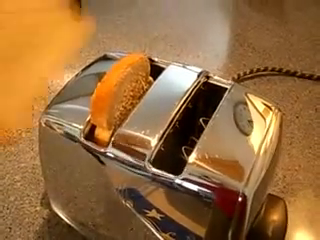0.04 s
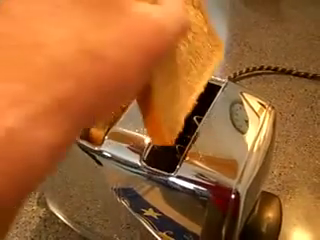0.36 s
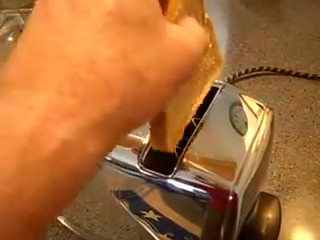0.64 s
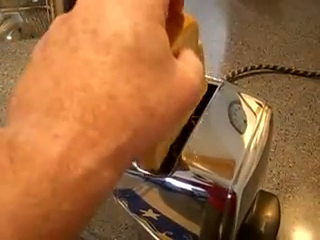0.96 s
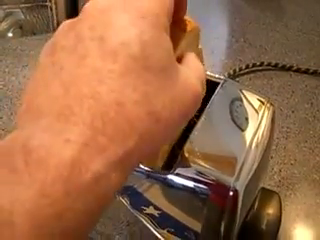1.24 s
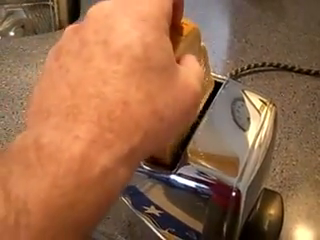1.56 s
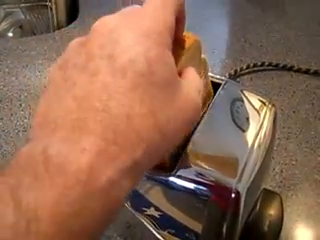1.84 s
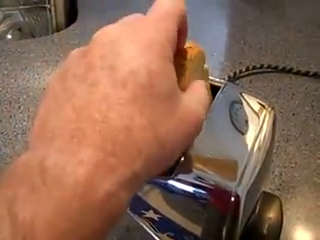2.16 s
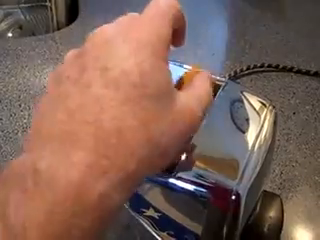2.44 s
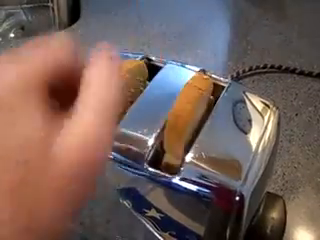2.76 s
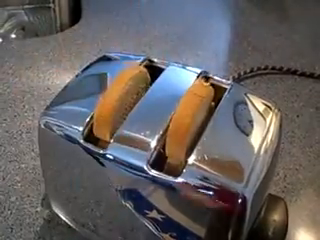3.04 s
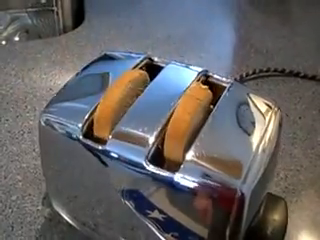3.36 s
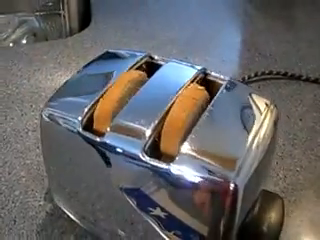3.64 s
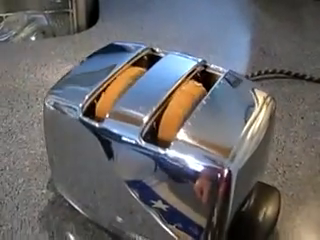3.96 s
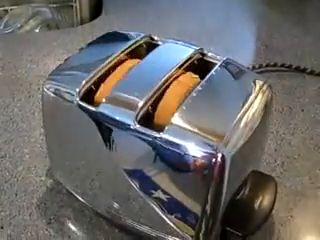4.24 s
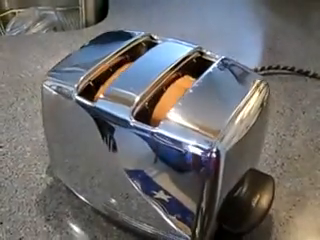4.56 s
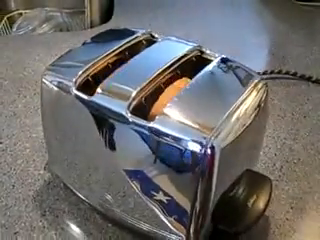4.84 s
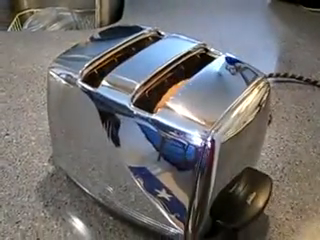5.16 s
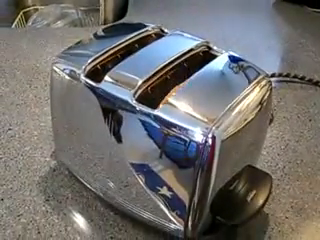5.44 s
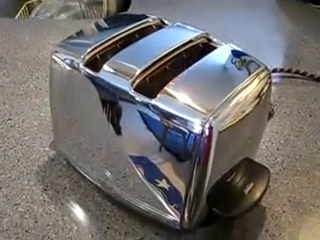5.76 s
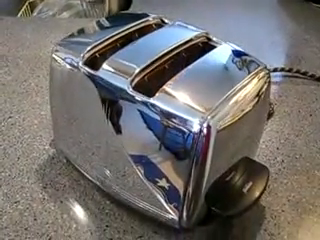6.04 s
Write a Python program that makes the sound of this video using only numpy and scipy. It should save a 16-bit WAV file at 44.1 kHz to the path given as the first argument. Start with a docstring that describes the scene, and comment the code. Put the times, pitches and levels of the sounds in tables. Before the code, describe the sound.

Bread scrapes into a metal toaster with light clacks, then after a pause the latch snaps shut, over quiet kitchen hum.

```python
"""A slice of bread goes into a chrome toaster, over room air, fridge hum, a far clock and a faint whine.
From 1.2 s the background grows louder, the crust scratches in the slot and the sprung carriage bounces.
Near 2 s the crust squeaks by stick-slip friction, then the slice drops on the wire rack.
At 3 s the lever is taken up with a clack; after a silent travel it snaps into its latch at 6.1 s.
Each impact on rack, lever or latch chatters and excites the damped modes of the steel."""
import sys
import numpy as np
from scipy import signal
from scipy.fft import rfft, irfft
from scipy.io import wavfile

SR = 44100
rng = np.random.default_rng(int(sys.argv[2]) if len(sys.argv) > 2 else 0)


def digitize_waveform(pressure):
    """Quantize a signal to 16-bit integers and store it at the path in sys.argv[1].

    Rows of a 2-D input are taken as channels; values are limited to [-1, 1].
    """
    field = np.atleast_2d(pressure).T
    bounded = np.clip(field, -1, 1)
    quanta = np.round(bounded * 32767).astype(np.int16)
    wavfile.write(sys.argv[1], SR, quanta)


N = 269010
T = np.arange(N) / SR
AGE = T[:2 ** 14]  # time since a contact


def rack():
    """Impact excitation: the falling slice sets the wire rack ringing."""
    hits = [(2.2548, -37, 1.4764, 13960, 0.0091, -8), (2.331, -45.5, -3, 3200, 0.013, 1.5),
            (2.3553, -24, 1.1, 15500, 0.012, -5)]  # landings: t/s, level/dB, tilt/(dB/octave), cutoff/Hz, chatter/s, ring/dB
    modes = [(562, -11, 0.293), (660, -2.5, 0.41), (700, -6, .18), (827, -5, 0.24), (1314, -9, 0.32),
             (1405, -13.5, 0.32), (1823, -9, 0.23), (1990, -4, 0.13), (2292, -6, 0.24), (2496, 0.5, 0.11),
             (2856.2, -7, 0.0788), (3550, -7.5, 0.16), (4100, -9.5, 0.14), (4842, -7, 0.1263),
             (6400, -17, .15), (9500, -23.5, 0.23), (9850, -14, 0.21), (10249, -19, 0.1509)]  # rack resonances: f/Hz, level/dB, unscaled T60/s
    colour = [(88, -48.5), (150, -15), (466, -12), (662, -1.5), (998, -14), (1340, -10), (2180, -9.5),
              (2360, -8), (3040, -11.5), (4410, -16.5), (4670, -14), (7620, -23), (10000, -17.5),
              (14800, -29), (16000, -42)]  # impact spectrum: f/Hz, level/dB
    return clack(hits, modes, colour, t60_scale=1.05, room_db=-2)


def lever():
    """Backlash: the lever is touched and strikes steel as it takes up its play."""
    hits = [(2.976, -49.5, 1.5, 5500, 0.0091, -5), (3.0378, -28, 1, 16000, 0.013, -3.5),
            (3.1755, -40, 2.5, 9800, .012, -5.5)]  # contacts: t/s, level/dB, tilt/(dB/octave), cutoff/Hz, chatter/s, ring/dB
    modes = [(653, -6.5, 0.5), (1069, -4, 0.25), (1168, -11, 0.43), (1303, -6, .28), (1415, -1, 0.2),
             (1614, -8, 0.19), (1672, -2, 0.37), (1940, -6, 0.16), (2250, -9, 0.13), (2500, -0.5, 0.14),
             (2750, -0.5, 0.15), (3140, -8, 0.14), (3305, -5, .15), (5310, -9.5, 0.14), (5841, -14, .14),
             (7600, -12, .18), (9652, -14, .09)]  # lever resonances: f/Hz, level/dB, unscaled T60/s
    colour = [(88, -40), (150, -6), (504, -9.5), (624, -6), (941, -6.5), (1660, -4.5), (2270, -10),
              (2700, -10.5), (4000, -10.5), (4320, -19), (5250, -16.5), (8070, -14), (11300, -17),
              (13700, -17.5), (16000, -36)]  # impact spectrum: f/Hz, level/dB
    return clack(hits, modes, colour, t60_scale=0.78, room_db=-3)


def latch():
    """Impacts in close succession fuse into one snap: the carriage meets its stop and the latch shuts."""
    hits = [(6.0612, -29, -5, 13000, 0.0066, -1.5), (6.0692, -19, 0, 16000, 0.00641, -10),
            (6.0752, -20, -0.4, 13590, 0.012, -7)]  # contacts: t/s, level/dB, tilt/(dB/octave), cutoff/Hz, chatter/s, ring/dB
    modes = [(219, -9, .15), (354, -8, 0.12), (614, 3.5, 0.085), (1312, 0, 0.32), (2173, -1, .12),
             (2504, -2.5, .15), (4450, -9, .08), (5088.3, -1, .1), (6800, 1, .06), (7390, 0, .15),
             (8581, 9, 0.12), (9100, 1, .15), (11000, -8, .08)]  # latch resonances: f/Hz, level/dB, unscaled T60/s
    colour = [(88, -38.5), (150, -18.5), (376, -9.5), (494, -10), (1100, -11), (1310, -5), (1560, -10),
              (2450, -2.5), (2980, -12), (4320, -4), (5910, -8.5), (6770, 0), (7920, -14), (8730, -4),
              (16000, -15)]  # impact spectrum: f/Hz, level/dB
    return clack(hits, modes, colour, t60_scale=0.66, room_db=-3)


def clack(hits, modes, colour, t60_scale, room_db):
    """Impact response of a thin shell: dense modes die fast, a few ring on, the kitchen reverberates."""
    decay = [(502, 0.084, 0.53), (2000, 0.13, 0.33), (5000, 0.055, 0.22), (9000, 0.051, 0.16),
             (14000, 0.0623, 0.11)]  # decay by band: f/Hz, shell T60/s, room T60/s
    band_hz, shell_t60, room_t60 = np.transpose(decay)
    out = np.zeros(N)
    for s, db, tilt_db, cutoff_hz, chatter, ring_db in hits:
        rebounds = undb(0.96 * walk(654, AGE))  # tiny rebounds roughen the attack
        shell = band_decay(noise(colour, len(AGE), tilt_db), band_hz, shell_t60, chatter)
        crack = shell * swell(0.0006) * rebounds
        tone = unit(ring(modes, tilt_db, t60_scale, hold=chatter / 2) * swell(0.0084), size=900)
        room = band_decay(noise(colour, len(AGE), tilt_db), band_hz, room_t60) * swell(0.0081)
        blow = crack + undb(ring_db) * tone + undb(room_db) * room
        softness = signal.butter(4, cutoff_hz, fs=SR, output="sos")  # a softer contact has less treble
        add(out, s, undb(db) * signal.sosfilt(softness, blow))
    return out


def ring(modes, tilt_db, t60_scale, hold, loose_cycles=0.099):
    """Modal superposition: beating pairs decay after the contact; loose parts shake their phase."""
    hz, db, t60 = np.transpose(modes)[:, :, None]
    phase, twin_phase, split = rng.random((len(modes), 3)).T[:, :, None]
    shaken = hz * AGE + loose_cycles * np.array([walk(88, AGE) for _ in modes])
    twin_hz = hz * (1 + 0.029 * (split - .5))
    pair = np.sin(2 * np.pi * (shaken + phase)) + 0.75 * np.sin(2 * np.pi * (twin_hz * AGE + twin_phase))
    return np.sum(undb(db + tilt_db * np.log2(hz)) * fade(t60 * t60_scale, hold) * pair, axis=0)


def carriage():
    """Friction-damped bouncing on a spring: each soft blow excites low body modes and a counter thud."""
    pushes = [(1.266, -36, -42.5, .117), (2.314, -45.5, -49, .105), (2.416, -36, -47.5, .108),
              (6.068, -38, -38, .11)]  # soft pushes: t/s, body level/dB, thud level/dB, bounce interval/s
    modes = [(89.3, -6.5, 0.29), (208.4, -5, 0.12), (243, 2.5, 0.085), (306, -5, 0.054),
             (351.6, -0.5, 0.15)]  # body resonances: f/Hz, level/dB, unscaled T60/s
    colour = [(15, -31), (25, 1), (92, -0.5), (155, -38), (352, -0.5), (536, -27), (681, -17), (977, -33),
              (1370, -24), (1550, -32), (3000, -37), (3900, -64), (6600, -120)]  # spectrum of the counter's thud: f/Hz, level/dB
    friction_share, extra_thud_loss_db = .32, 3  # losses per bounce
    out = np.zeros(N)
    for s, body_db, thud_db, gap in pushes:
        for bounce in range(3):
            ringing = ring(modes, tilt_db=0, t60_scale=0.95, hold=0.0042, loose_cycles=0.02)
            body = unit(ringing * swell(.004), size=900)
            thud = noise(colour, len(AGE)) * swell(.005) * fade(0.41, hold=0.033)
            blow = undb(body_db) * body + undb(thud_db - bounce * extra_thud_loss_db) * thud
            add(out, s + bounce * gap, (1 - bounce * friction_share) * blow)
    return out


def crust():
    """Brittle fracture: crumbs break in bursts of tiny impulses, filtered and smeared by the slot."""
    catches = [(1.217, -60.5, 8000, .7), (1.448, -59.5, 10000, .5), (1.748, -50.5, 5000, 1.3),
               (2.21, -52, 4440, 1), (2.833, -55.5, 10200, .14)]  # crust catching on the slot: t/s, level/dB, centre f/Hz, width/octaves
    scratch_s = .015
    out = np.zeros(N)
    for s, db, hz, octaves in catches:
        grains = rng.standard_normal(len(AGE)) * (rng.random(len(AGE)) < .15)
        scratch = unit(shape(grains, lambda f: bell(f, hz, octaves) / np.sqrt(f)))
        add(out, s, undb(db) * scratch * swell(scratch_s / 5) * fade(.06, hold=scratch_s))
    return out


def squeak():
    """Stick-slip oscillation: crust rubs on steel at an uneven rate, swelling and fading in one arch."""
    harmonics = [0.5, -17, -8, -10]  # harmonics one to four: level/dB
    start_s, length_s, slip_hz, jitter = 1.945, 0.16, 1385, .1
    cycles = np.cumsum(slip_hz * (1 + jitter * walk(900, AGE))) / SR
    tone = sum(undb(db) * np.sin(2 * np.pi * k * cycles) for k, db in enumerate(harmonics, 1))
    arch = np.sin(np.pi * np.minimum(AGE / length_s, 1))
    out = np.zeros(N)
    add(out, start_s, undb(-52) * unit(tone) * arch)
    return out


def clock():
    """Reverberation: a far wall clock is heard mostly through the room, every other beat softer."""
    colour = [(500, -25), (1100, -5.5), (1500, -2), (2000, -11), (3200, -12), (4600, -14.5), (7000, -25),
              (12000, -42)]  # tick spectrum: f/Hz, level/dB
    first_s, period_s = .002, 1.0
    out = np.zeros(N)
    for beat, s in enumerate(np.arange(first_s, T[-1], period_s)):
        tick = noise(colour, len(AGE)) * swell(0.004) * fade(0.29, hold=0.036)
        add(out, s, undb(-50 if beat % 2 else -51.5) * tick)
    return out


def room_air():
    """Broadband ambient noise, strongest in the bass and wavering slightly."""
    colour = [(12, -22), (20, 5.5), (42, 0), (87, -8), (119, -5), (148, -9), (274, -10.5), (333, -12),
              (439, -13), (1580, -20), (1720, -20.5), (7520, -31.5), (8170, -30.5), (12400, -35.5),
              (15500, -36)]  # air spectrum: f/Hz, level/dB
    air = noise(colour, N)
    air /= np.std(shape(air, lambda f: f > 500))  # the part above 500 Hz sets the level
    return air * undb(-50.5 + 0.27 * walk(3.3))


def fridge():
    """Forced vibration: motor and mains drive low partials that wander in level and phase."""
    partials = [(30, -55.5), (59.3, -55), (89.5, -58), (118.6, -52.3), (150, -65), (177.6, -63.5),
                (241.5, -66.5), (328.4, -60.5), (359, -63)]  # line spectrum: f/Hz, level/dB before the background gain
    hum = np.zeros(N)
    for hz, db in partials:
        gain = undb(db + 2 * walk(3))
        hum += gain * unit(np.sin(2 * np.pi * hz * T + hz / 400 * walk(7)))
    return hum


def electronics():
    """Amplitude modulation: a thin whine flickers and a lower tone pulses in faint rapid pips."""
    whine_hz, pip_hz, pip_rate_hz = 15735, 7900, 29.975
    whine = undb(-70 + 2.5 * walk(25)) * unit(np.sin(2 * np.pi * whine_hz * T))
    cycle = (T * pip_rate_hz - .15) % 1 - .5
    pips = np.exp(-(cycle / 0.1) ** 2) * np.sin(2 * np.pi * pip_hz * T + .8 * walk(140))
    return whine + undb(-51.5) * pips


def background_gain():
    """A common gain: the whole background steps up twice and swells slowly."""
    steps = [(1.255, 0.016, 7.5), (2.2, 0.37, 2)]  # rises in level: t/s, rise time/s, step/dB
    start_db, swell_db_per_s = -10, 0.1721
    stepped_db = sum(db * np.clip((T - s) / rise, 0, 1) for s, rise, db in steps)
    return undb(start_db + swell_db_per_s * T + stepped_db)


def undb(db):
    """Level in decibels to amplitude ratio."""
    return 10 ** (np.asarray(db) / 20)


def unit(x, size=None):
    """Normalise to rms 1 over the first samples (all by default)."""
    return x / np.sqrt(np.mean(x[:size] ** 2) + 1e-20)


def shape(x, gain):
    """Zero-phase filtering by a gain that is a function of frequency."""
    hz = np.maximum(np.fft.rfftfreq(len(x), 1 / SR), 1)
    return irfft(rfft(x) * gain(hz), len(x))


def noise(colour, size, tilt_db=0):
    """Gaussian noise with a spectrum of (f/Hz, level/dB) points, tilted by dB per octave."""
    hz, db = np.transpose(colour)
    db = db + tilt_db * np.log2(hz)
    return unit(shape(rng.standard_normal(size), lambda f: undb(np.interp(np.log(f), np.log(hz), db))))


def bell(f, hz, octaves):
    """Gaussian passband on a log-frequency axis."""
    return np.exp(-.5 * (np.log2(f / hz) / octaves) ** 2)


def fade(t60, hold=0):
    """Exponential decay, 60 dB in t60 seconds, after a hold at full level."""
    return np.exp(-np.log(1000) * np.maximum(AGE - hold, 0) / t60)


def band_decay(x, hz, t60s, hold=0):
    """Frequency-dependent damping: each band dies away at its own rate."""
    bands = (shape(x, lambda f: np.interp(np.log(f), np.log(hz), share)) for share in np.eye(len(hz)))
    return sum(band * fade(t60, hold) for band, t60 in zip(bands, t60s))


def swell(rise_s):
    """First-order build-up from silence."""
    return 1 - np.exp(-AGE / rise_s)


def walk(rate_hz, time=T):
    """Random modulation: straight lines between Gaussian values, with a spread near 1."""
    knots = np.arange(0, time[-1] + 1, 1 / rate_hz)
    return np.interp(time, knots, rng.standard_normal(len(knots)))


def add(out, s, sound):
    """Superpose a sound, starting at s seconds."""
    i = int(s * SR)
    out[i:i + len(sound)] += sound[:max(N - i, 0)]


def scene():
    """Linear superposition of all sources at one microphone above the counter."""
    toaster = rack() + lever() + latch() + carriage() + crust() + squeak()
    background = clock() + room_air() + fridge() + electronics()
    return (toaster + background * background_gain())[None]


def record(dry):
    """Frequency response: the microphone has a narrow treble dip, and a low-pass limits the band."""
    dip_hz, cutoff_hz = 7850, 15900
    b, a = signal.iirnotch(dip_hz, Q=12, fs=SR)
    coloured = .5 * (dry + signal.lfilter(b, a, dry))
    return signal.sosfilt(signal.ellip(10, .2, 80, cutoff_hz, fs=SR, output="sos"), coloured)


dry = scene()
out = record(dry)
digitize_waveform(out)
```